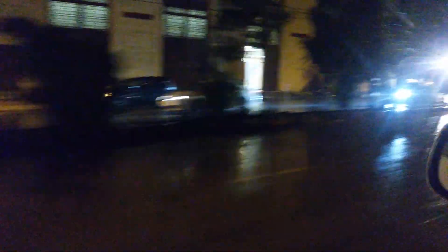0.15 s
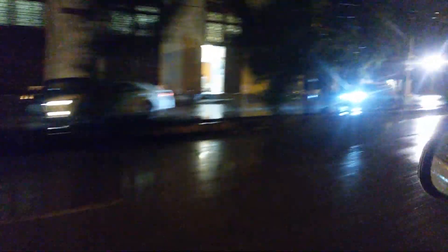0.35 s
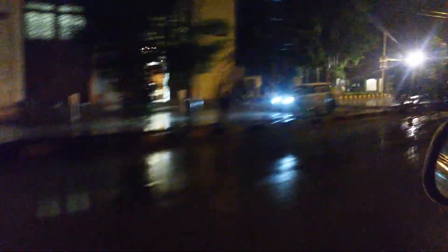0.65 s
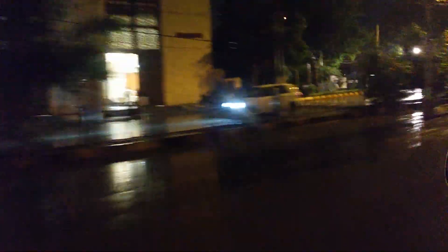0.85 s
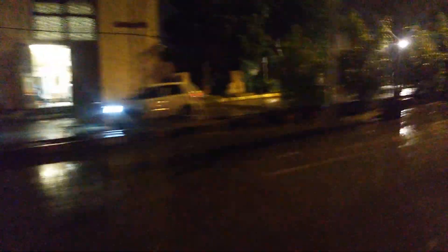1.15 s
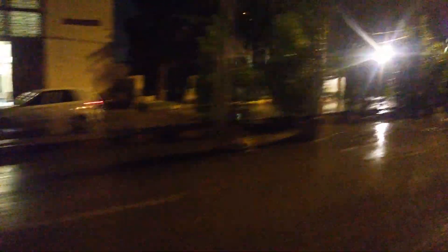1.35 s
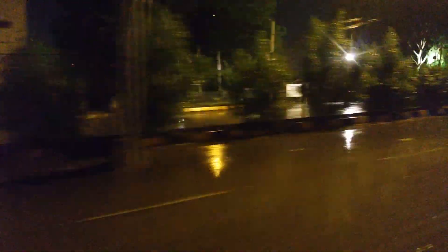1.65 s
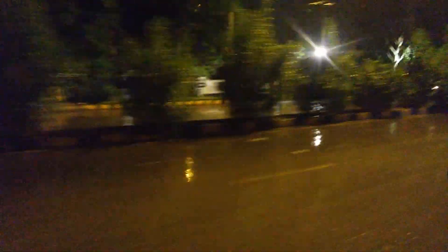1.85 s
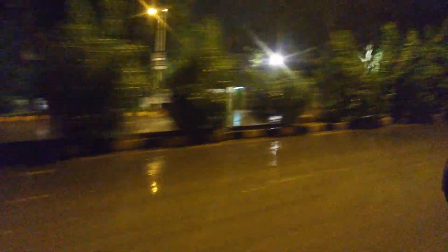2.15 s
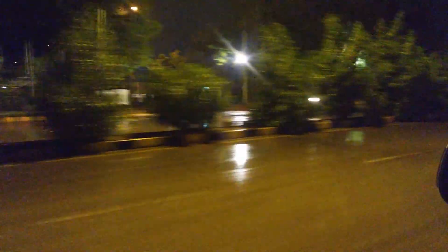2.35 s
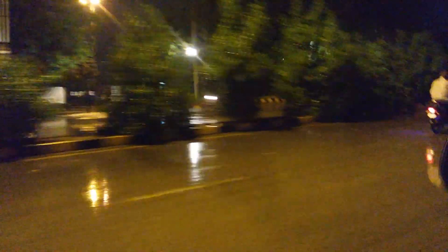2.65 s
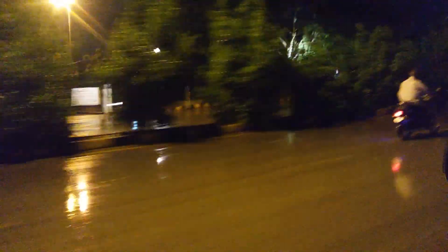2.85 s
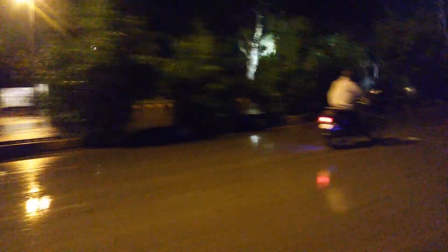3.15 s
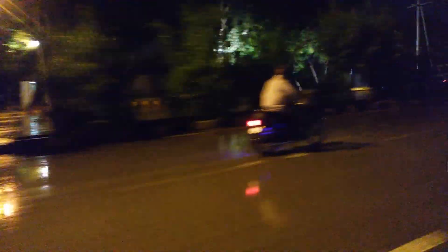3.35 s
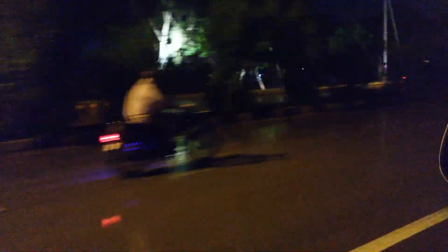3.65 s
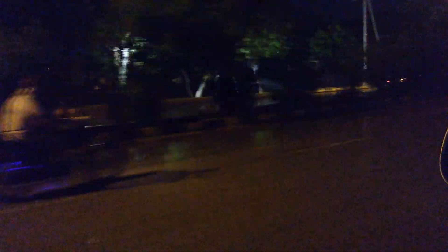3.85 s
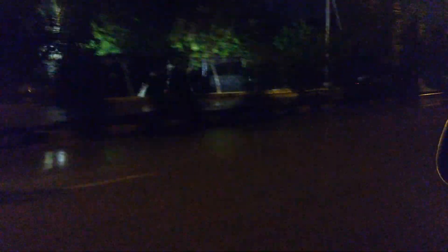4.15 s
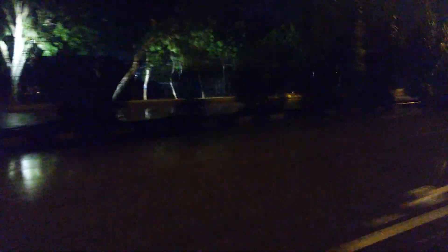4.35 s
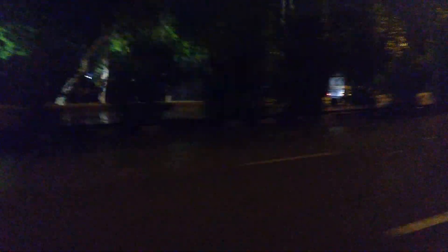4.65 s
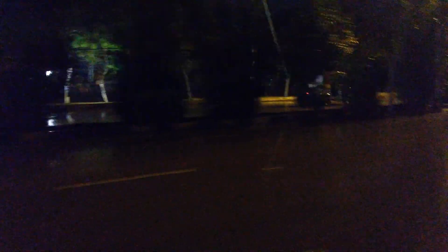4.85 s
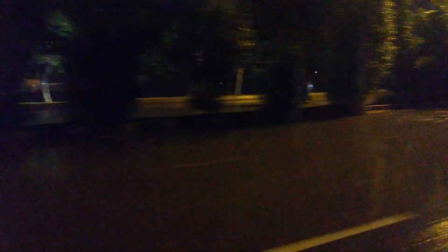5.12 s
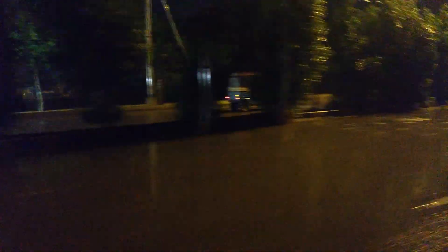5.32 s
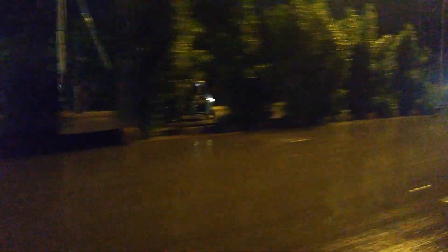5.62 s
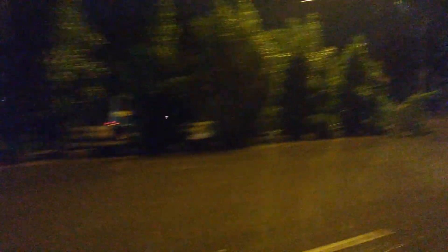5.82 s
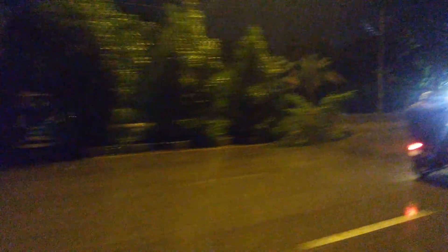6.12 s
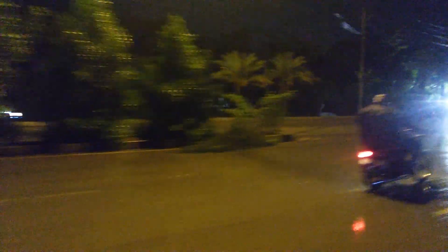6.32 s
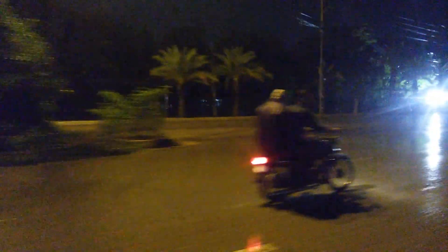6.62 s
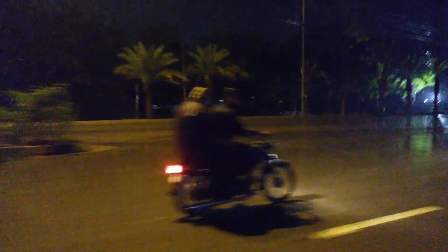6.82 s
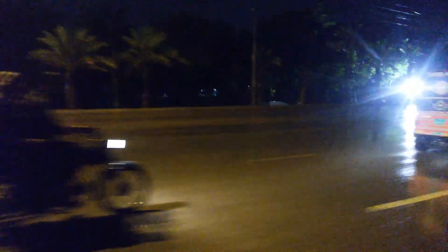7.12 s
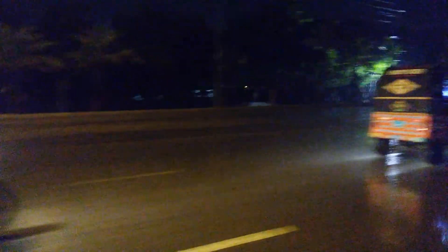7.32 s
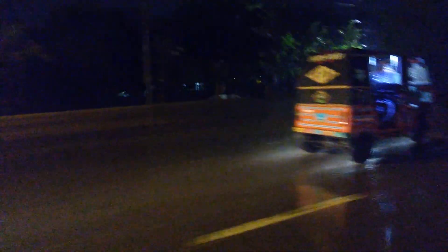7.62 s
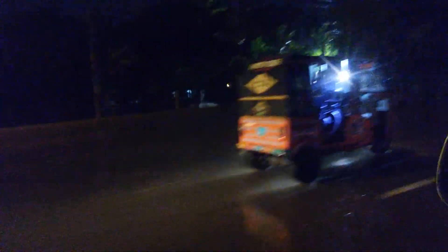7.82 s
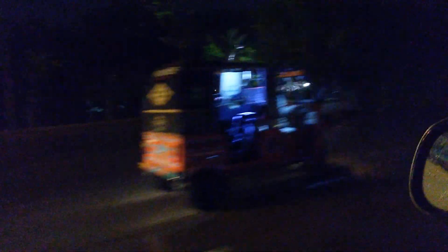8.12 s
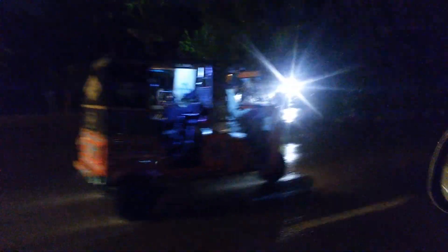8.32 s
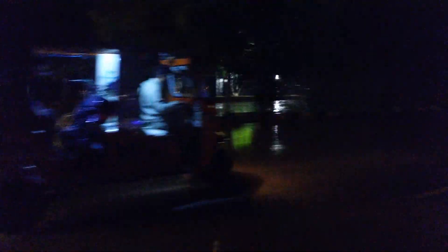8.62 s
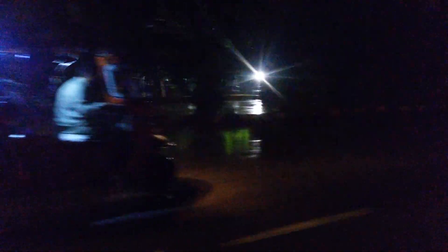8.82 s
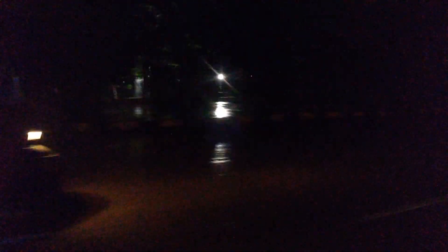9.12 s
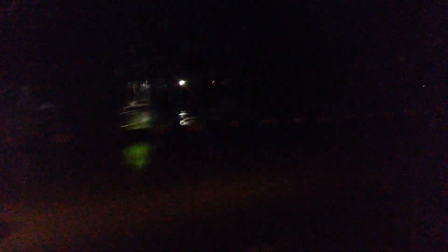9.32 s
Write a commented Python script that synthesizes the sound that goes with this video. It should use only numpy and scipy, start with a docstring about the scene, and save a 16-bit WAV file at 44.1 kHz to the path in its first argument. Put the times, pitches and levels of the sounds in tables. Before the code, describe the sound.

A car drives along a wet road, with gusts thumping against a microphone at the open window over steady tyre spray and road rumble. A few sharp ticks sound close by. After a short lull in the wind, the gusts return, and in the last third an auto-rickshaw grows louder outside, puttering and rasping with a wavering whine, a faint high whistle and occasional chinks of loose metal.

```python
"""Inside a car on a wet road at night, microphone by an open side window.
From the start, slipstream eddies slap the microphone, the hardest overloading it, while the tyres
hiss through the water over the road's rumble and a few sharp ticks sound close by. Near 4 s the wind
and the rumble ease briefly. From about 6 s the car draws level with an auto-rickshaw, whose single
cylinder putters and rasps outside the window, with gear whine, a thin whistle and chinks of metal."""
import sys
import numpy as np
from scipy import signal
from scipy.fft import rfft, irfft, next_fast_len
from scipy.io import wavfile
from scipy.ndimage import uniform_filter1d, map_coordinates

SR = 44100
rng = np.random.default_rng(int(sys.argv[2]) if len(sys.argv) > 2 else 0)


def generate_wav(signal):
    """Clip the signal to [-1, 1] and save it as 16-bit WAV at the path in sys.argv[1]."""
    frames = np.transpose(np.atleast_2d(signal))
    scaled = np.clip(frames, -1, 1) * 32767
    pcm = np.round(scaled).astype(np.int16)
    wavfile.write(sys.argv[1], SR, pcm)


N = 417627

# course of the low rumble, with a lull near 4 s: (time [s], relative level [dB])
RUMBLE_LEVELS = [(0, -22), (1.9, -23.5), (2.9, -26.5), (3.45, -31), (3.68, -32.5), (4.08, -29.5),
                 (4.2, -29.5), (5.8, -25), (6.1, -28.5), (8.15, -28.5), (8.85, -24), (9.47, -25)]


def amp(db):
    """Decibels to gain."""
    return 10 ** (np.asarray(db) / 20)


def unit(x):
    """Scale to rms 1."""
    return x / np.sqrt(np.mean(x ** 2) + 1e-20)


def curves(rows):
    """One value per sample for each column after the time."""
    times, *columns = np.transpose(rows)
    return [np.interp(np.arange(N) / SR, times, column) for column in columns]


def wobble(rate):
    """A smooth random curve, rate knots a second."""
    return map_coordinates(rng.standard_normal(2048), [np.arange(N) * rate / SR], mode="wrap")


def filtered(x, response):
    """Filter x by a gain given as a function of frequency."""
    size = next_fast_len(len(x) + 4096)
    return irfft(rfft(x, size) * response(np.fft.rfftfreq(size, 1 / SR)), size)[:len(x)]


def coloured(x, spectrum):
    """Filter x by (frequency [Hz], gain [dB]) points joined on a log axis."""
    points_hz, db = np.transpose(spectrum)
    return filtered(x, lambda hz: amp(np.interp(np.log(hz + 1), np.log(points_hz + 1), db)))


def rush(spectrum, patchy_db):
    """Coloured noise of rms 1 with patches of random gain."""
    cells = signal.stft(rng.standard_normal(N), nperseg=512)[2]
    patches = uniform_filter1d(rng.standard_normal(cells.shape), size=6, axis=0)
    patches = uniform_filter1d(patches, size=12, axis=1)
    noise = signal.istft(cells * amp(patchy_db * unit(patches)), nperseg=512)[1][:N]
    return unit(coloured(noise, spectrum))


def ringing(samples, centre_hz, width_hz):
    """Noise through one narrow resonance."""
    return filtered(rng.standard_normal(samples), lambda hz: 1 / (1 + ((hz - centre_hz) / width_hz) ** 2))


def slipstream():
    """Wind on the microphone: eddies swell, sputter and die; big slow ones thump, small fast ones pop."""
    # the stronger eddies: (time [s], relative level [dB], length [s], centre [Hz])
    buffets = [(.161, 4, 0.022, 498), (.178, -7, 0.017, 329), (.204, -2.5, .015, 541),
               (.301, -15.5, 0.075, 304), (.343, -9, 0.059, 224.7), (.388, -7, 0.031, 309),
               (.426, -8.5, 0.038, 390), (.499, -5, 0.01, 365), (.633, -17.5, 0.057, 286.5),
               (.663, -7.5, 0.016, 346), (.773, -12.5, 0.027, 283.4), (.814, -10, 0.023, 392),
               (.891, -13.5, 0.02, 240), (1.001, -14, 0.013, 287), (1.046, 4, 0.018, 561.5),
               (1.06, 0.5, 0.019, 378.6), (1.125, -13.5, 0.03, 279), (1.177, -10, 0.018, 425),
               (1.222, -17, .025, 298), (1.276, -8.5, 0.023, 181.5), (1.312, -5.5, 0.028, 399),
               (1.343, -10, 0.023, 228), (1.405, -20.5, 0.048, 251), (1.476, -6.5, 0.039, 331),
               (1.604, -6, 0.017, 461), (1.67, -14, 0.011, 333), (1.716, -5.5, .018, 419),
               (1.787, -2.5, 0.015, 443.4), (1.803, -8.5, 0.021, 416.5), (1.881, -8, 0.023, 341),
               (1.93, -15, 0.019, 263.4), (2.047, -14, 0.036, 400), (2.094, 3, 0.022, 467),
               (2.182, -8, 0.024, 335.5), (2.28, -19.5, 0.024, 222.6), (2.415, -2.5, 0.034, 419),
               (2.477, -3, 0.038, 473), (2.52, -7.5, 0.043, 377.6), (2.585, -10.5, 0.044, 371),
               (2.774, -10.5, 0.034, 359.5), (2.796, -4.5, 0.035, 443), (2.865, -15.5, 0.023, 342),
               (2.919, -1, 0.03, 486), (3.11, -16.5, 0.067, 160.3), (3.148, -10, 0.013, 384),
               (3.167, -11, 0.026, 352), (3.282, -1, 0.059, 427.4), (3.324, -4.5, 0.035, 442),
               (3.419, -2.5, 0.015, 320), (3.53, -14.5, 0.019, 199.6), (3.549, -9.5, 0.025, 395),
               (3.582, -21, 0.041, 258), (4.137, -13, 0.012, 273.5), (4.164, -19, 0.055, 312.4),
               (4.201, -11, 0.0097, 331), (4.25, -12, 0.056, 331), (4.32, -18.5, 0.021, 284),
               (4.403, -19, 0.019, 260), (4.522, -1, 0.02, 441), (4.554, -7, 0.041, 352),
               (4.771, -10.5, 0.026, 427), (4.806, -11.5, 0.041, 252), (4.88, -15.5, 0.036, 287.6),
               (4.955, -17.5, 0.022, 230.6), (5.064, -8, 0.051, 358.3), (5.135, -15, 0.02, 338),
               (5.232, -4, 0.026, 474), (5.262, -10, 0.026, 398), (5.532, -1.5, .019, 436.5),
               (5.612, -14, 0.027, 300), (5.671, -0.5, 0.0204, 367), (5.692, -5.5, 0.036, 347),
               (5.739, -6, 0.059, 328.6), (5.789, -10.5, 0.041, 340), (5.849, -7, 0.016, 163),
               (5.862, -12.5, 0.047, 324), (5.964, -15, 0.011, 290), (6.076, -12, 0.015, 303),
               (6.165, -4.5, 0.016, 496), (6.265, -20.5, 0.031, 246), (6.313, -5, 0.04, 363.6),
               (6.469, -12, 0.023, 155.5), (6.582, -12, 0.019, 153.3), (6.901, -5, 0.015, 257.7),
               (6.908, -11.5, 0.043, 449), (7.035, -8.5, 0.03, 304.7), (7.058, -13.5, 0.025, 325.4),
               (7.093, -12, 0.018, 297), (7.252, -13.5, 0.037, 443), (7.325, -18, 0.056, 347.4),
               (7.395, -11.5, 0.039, 325.5), (7.515, -14.5, 0.017, 281), (7.564, -9, 0.031, 420),
               (7.819, -11.5, 0.027, 348.6), (8.375, -13.5, 0.038, 346), (8.695, -9, 0.036, 270),
               (8.818, -16.5, 0.038, 248), (8.912, -9.5, 0.031, 300), (8.948, -11.5, 0.012, 327),
               (9.055, -9.5, 0.041, 482), (9.198, -9.5, 0.028, 290), (9.227, -10.5, 0.034, 261.6),
               (9.335, -18, 0.048, 277.5)]
    # spectrum of an eddy centred on eddy_hz: (frequency [Hz], level [dB])
    eddy_spectrum = [(15, -51), (45, -12.5), (100, -7), (200, 1.5), (300, 0), (450, -5), (800, -11),
                     (1400, -20), (2500, -32.5), (5000, -56), (10000, -96)]
    eddy_hz = 257.5
    rise, fall = .27, .52  # shares of an eddy's length
    wake_db, wake_s = -18, 0.032  # the slow, low swirl that trails it: level under its height, fade time
    lead = SR // 20
    air = np.zeros(N + SR)
    t = (np.arange(SR // 5) - lead) / SR
    sputter = amp(2.79 * np.clip(wobble(170), -2, 1.2))
    snaps = amp(10.0 * np.clip(wobble(700), -2, 1.2))  # the air tears in separate snaps
    tear_spectrum = [(500, 2.0), (1300, 8.5), (3000, 0.0), (4500, -1), (9000, -37), (14000, -50)]
    tearing = unit(sputter * snaps * rush(tear_spectrum, patchy_db=5.0))
    for s, db, length, centre_hz in list(buffets) + small_eddies(count=24):
        start = max(round(s * SR), 0)
        age = t / length - .3  # zero at the height of the eddy
        swell = np.where(age < 0, np.exp(-(age / rise) ** 2), 1 / (1 + np.abs(age / fall) ** 2.37))
        wake = (age > 0) * amp(wake_db) * np.exp(-np.abs(t - length) / wake_s)
        swell = np.maximum(swell, wake)
        speed = swell * np.resize(sputter[start:], len(t))
        # faster air carries the swirls past the microphone sooner, so they sound higher
        travel = np.cumsum(np.clip(speed, .15, 2.5) ** .38) * centre_hz / eddy_hz
        swirls = coloured(rng.standard_normal(len(t)), eddy_spectrum)
        push = unit(speed * map_coordinates(swirls, [travel], mode="wrap")) * np.sqrt(np.mean(swell ** 2))
        tear_gain = np.minimum(amp(db + 2.0) * swell, 1.9) ** 2.27  # only fast air tears at the edge
        crackle = tear_gain * np.resize(tearing[start:], len(t))
        air[start:][:len(t)] += amp(db + 3.0) * push + amp(-7.5) * crackle
    return air[lead:][:N]


def small_eddies(count):
    """Weak eddies shed at uneven intervals, rising and falling with the rumble; rows as in buffets."""
    place, weakness, size, pace = rng.standard_normal((count, 4)).T
    times = (np.arange(count) + place % 1) / count * N / SR
    db = np.interp(times, *np.transpose(RUMBLE_LEVELS)) + 8.5 - 2 * weakness
    length_s = 0.022 * np.exp(0.38 * size)
    centre_hz = 251.2 * np.exp(.25 * pace)
    return list(zip(times, db, length_s, centre_hz))


def tyres():
    """Below the window the tread roars and flings up water; single droplets make the spray grainy."""
    # tyre hiss, dipping and stepping back up at 0.6 and 4.1 s with the recorder's gain:
    # (time [s], spray [dB], tread [dB])
    tyre_levels = [(0, -24, -22), (0.3, -21.5, -20.5), (0.54, -29.5, -24.5), (0.61, -23.5, -21.5),
                   (.78, -22.5, -20.5), (.86, -26, -23.5), (1.0, -24, -20.5), (1.55, -26, -22.5),
                   (1.8, -27.5, -22.5), (2.0, -25.5, -22), (2.55, -27, -22.5), (2.75, -26, -24),
                   (3.0, -23.5, -22), (3.2, -23.5, -21), (3.7, -24.5, -24.5), (4.07, -28, -26.5),
                   (4.12, -23, -21.5), (4.5, -23.5, -23), (5.4, -25.5, -23.5), (5.82, -24, -22.5),
                   (5.95, -22, -22), (6.4, -22, -22), (7.5, -19, -18), (8.3, -18, -22), (8.9, -18.5, -18.5),
                   (9.47, -20, -21)]
    # spectrum of the tread's roar: (frequency [Hz], level [dB])
    roar_spectrum = [(300, -7), (600, -1), (950, -1.5), (1200, 4), (1600, -0.5), (2300, 3), (3000, -1),
                     (3700, -2), (5000, -4.5), (9000, -122)]
    # spectrum of the hiss as heard, with a notch near 12 kHz: (frequency [Hz], level [dB])
    hiss_spectrum = [(1500, -12), (3000, -3), (3900, -7), (4500, 2.5), (5150, 3), (5800, -2), (7000, -8.5),
                     (8300, -16.5), (10000, -26), (11800, -42), (13100, -29), (14200, -50)]
    spray_db, tread_db = curves(tyre_levels)
    film_db = 0.5 * wobble(12)  # the depth of the water film changes along the road
    roar = amp(tread_db) * rush(roar_spectrum, patchy_db=1.0)
    spray = amp(spray_db) * rush(hiss_spectrum, patchy_db=1.47)
    droplets = (rng.random(N) < 500 / SR) * rng.standard_normal(N)  # about 500 a second
    patter = amp(spray_db - 9.0) * unit(coloured(droplets, hiss_spectrum))
    return amp(film_db) * (roar + spray + patter)


def road():
    """The wheels shake the body around the microphone; it drones unevenly with the surface."""
    # spectrum of the body's drone: (frequency [Hz], level [dB])
    rumble_spectrum = [(20, -47), (60, -13.5), (110, -7.5), (200, 0), (330, 1), (480, -5.5), (700, -27),
                       (1200, -47), (3000, -94)]
    rumble_db, = curves(RUMBLE_LEVELS)
    return amp(rumble_db + 3.0 + 1.3 * wobble(12)) * rush(rumble_spectrum, patchy_db=3.5)


def rickshaw():
    """One cylinder alongside: each firing slaps the piston, thumps the pipe and lets out rasping gas."""
    # engine speed: (time [s], firing rate [Hz])
    firing_rates = [(6.2, 30.95), (7.0, 30.95), (7.9, 30.5), (8.5, 30.45), (9.47, 30.15)]
    # the engine at the window: (time [s], exhaust thump [dB], rasp [dB], piston slap [dB])
    engine_levels = [(6.2, -32, -55, -62), (6.55, -33, -49, -33), (7, -34, -30.5, -35.5),
                     (7.6, -30.5, -36.5, -27), (8, -28.5, -32, -29.5), (8.4, -27, -25.5, -31),
                     (8.8, -28, -21.5, -35), (9.47, -30.5, -24.5, -30)]
    # spectrum of the burst of gas: (frequency [Hz], level [dB])
    rasp_spectrum = [(400, -21), (900, -52), (1450, -8), (2000, -4.5), (2800, -8), (3700, -29), (4750, 4),
                     (5700, -2), (6600, -14), (8000, -30), (10500, -19.5), (13300, -27), (14500, -35)]
    # spectrum of the piston's slap: (frequency [Hz], level [dB])
    slap_spectrum = [(2000, -21), (3600, -9), (5200, 3), (6300, -1.5), (9000, -27), (14000, -49)]
    start_s, uneven_cycles = 6.254, 0.008  # the crank runs a little early or late
    firing_hz, = curves(firing_rates)
    thump_db, rasp_db, slap_db = curves(engine_levels)
    steady_cycle = np.cumsum(firing_hz * (np.arange(N) / SR > start_s)) / SR
    cycle = np.maximum.accumulate(steady_cycle + uneven_cycles * wobble(9) * (steady_cycle > 1))
    pulses = np.diff(np.floor(cycle), prepend=0) * amp(1.5 * rng.standard_normal(N))
    since = cycle % 1 / firing_hz  # seconds since the last firing
    burst = (1 - np.exp(-since / 0.00064)) * np.exp(-since / 0.048) * amp(0.93 * wobble(30))
    force = amp(1.4 * np.clip(wobble(30), -2, 1))
    knock = (1 - np.exp(-since / 0.00032)) * np.exp(-since / 0.0041) * force
    thump = amp(thump_db) * unit(filtered(pulses, exhaust_pipe))
    rasp = amp(rasp_db) * unit(burst * rush(rasp_spectrum, patchy_db=2.0))
    slap = amp(slap_db) * unit(knock * rush(slap_spectrum, patchy_db=5.0))
    return thump + rasp + slap + gear_whine(steady_cycle)


def exhaust_pipe(hz):
    """Response of the rickshaw's pipe: a sum of resonances of alternating sign."""
    # exhaust resonances: (frequency [Hz], width [Hz], level [dB])
    modes = [(133, 19, -3.5), (265, 21, 5), (336, 53, -4.5), (433, 19, -0.5), (860, 20, -5.5),
             (1318, 30, -9)]
    return sum((-1) ** k * amp(db) * 1j * hz * width / (centre ** 2 - hz ** 2 + 1j * hz * width)
               for k, (centre, width, db) in enumerate(modes))


def gear_whine(cycle):
    """The rickshaw's gears sing in wavering tones tied to the crank."""
    # gear tones: (multiple of the firing rate, relative level [dB])
    tones = [(14.5, -7), (28, 3), (29, 7), (43, -17)]
    # the whine at the window: (time [s], level [dB])
    whine_levels = [(6.2, -70), (6.8, -44), (7.4, -37.5), (7.95, -37), (8.4, -49), (9.47, -51)]
    whine_db, = curves(whine_levels)
    shaft = cycle + 0.0016 * wobble(9)
    return sum(amp(whine_db + db + 1.1 * wobble(1.9)) * np.sin(2 * np.pi * multiple * shaft)
               for multiple, db in tones)


def whistle(centre_hz, width_hz):
    """A narrow, wavering ring of metal while the rickshaw is near."""
    # the thin whistle, swelling twice: (time [s], level [dB])
    whistle_levels = [(6.8, -62), (7.1, -25), (7.33, -23), (7.45, -60), (8, -19), (8.4, -52), (9.47, -43)]
    whistle_db, = curves(whistle_levels)
    return amp(whistle_db) * unit(ringing(N, centre_hz, width_hz))


def rattle(ring_hz, width_hz, t60):
    """Loose metal chinks now and then as the rickshaw runs alongside."""
    # chinks of metal: (time [s], peak level [dB])
    strikes = [(6.545, -9), (6.578, -7), (6.74, -8), (6.997, -10), (8.296, -4), (9.354, -2)]
    chinks, t = np.zeros(N), np.arange(SR // 20) / SR
    for s, db in strikes:
        ring = ringing(len(t), ring_hz, width_hz) * amp(-60 * t / t60)
        chinks[round(s * SR):][:len(t)] += amp(db) * ring / np.abs(ring).max()
    return chinks


def ticks(t60):
    """Sharp ticks close to the microphone: overload clicks and a few stray drops."""
    # sharp ticks: (time [s], relative level [dB])
    tick_levels = [(.29, -13), (.412, -11), (.838, -18), (0.856, -8), (.872, -14), (0.903, -14),
                   (.915, -17), (3.429, -4), (6.401, -7)]
    bursts, t = np.zeros(N), np.arange(SR // 50) / SR
    for s, db in tick_levels:
        bursts[round(s * SR):][:len(t)] += amp(db - 60 * t / t60) * rng.standard_normal(len(t))
    return coloured(bursts, [(1000, 5), (5000, 7.0), (14000, -14)])


def scene():
    """Everything meets at one microphone by the open window."""
    alongside = rickshaw() + whistle(centre_hz=4650, width_hz=62)
    alongside += rattle(ring_hz=5240, width_hz=350, t60=0.052)
    return (road() + tyres() + slipstream() + ticks(t60=0.0051) + alongside)[None]


def gain_control(x, threshold_db, slope, recovery_db_per_s, attack_s):
    """Loud moments pull the recorder's gain down; it climbs back at a steady rate."""
    level_db = 10 * np.log10(np.abs(uniform_filter1d(x ** 2, size=220)) + 1e-9)
    climb_db = recovery_db_per_s * np.arange(N) / SR
    cut_db = np.maximum.accumulate(slope * np.maximum(level_db - threshold_db, 0) + climb_db) - climb_db
    pole = np.exp(-1 / (attack_s * SR))
    return x * amp(-signal.lfilter([1 - pole], [1, -pole], cut_db))


def record(dry):
    """The gain control is too slow for the hardest eddies, which clip; the top treble is cut off."""
    top_hz = 14600
    held = gain_control(dry[0], threshold_db=-12, slope=0.31, recovery_db_per_s=36, attack_s=0.0044)
    clipped = held / (1 + np.abs(held) ** 24) ** (1 / 24)
    return filtered(clipped, lambda hz: 1 / (1 + (hz / top_hz) ** 60))[None]


dry = scene()
out = record(dry)
generate_wav(out)
```